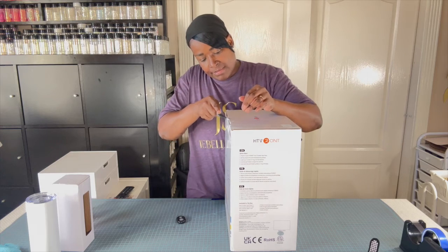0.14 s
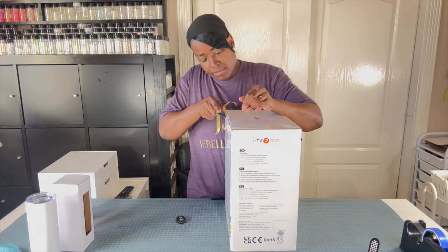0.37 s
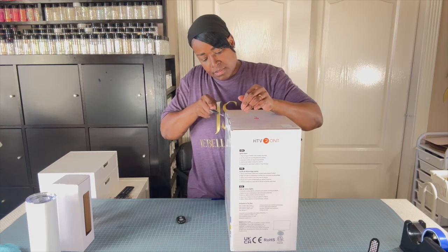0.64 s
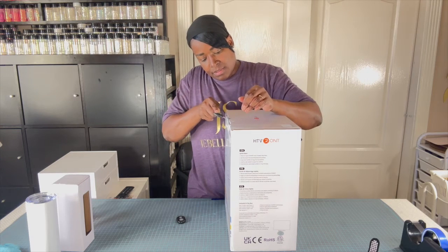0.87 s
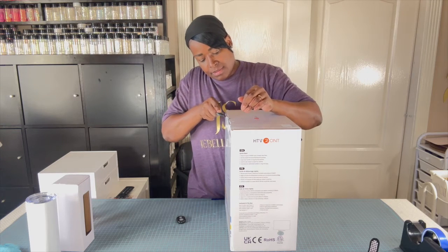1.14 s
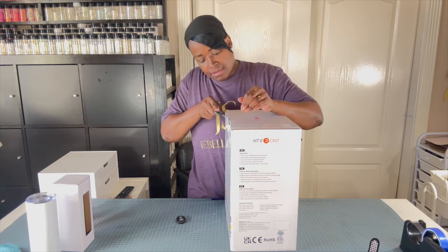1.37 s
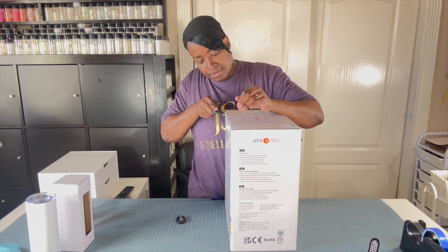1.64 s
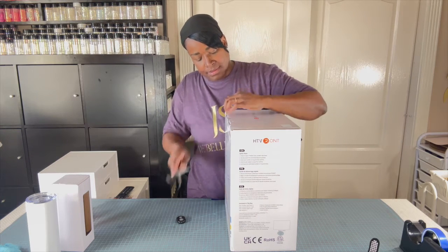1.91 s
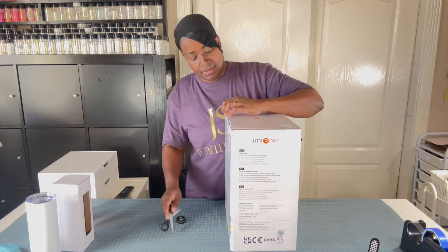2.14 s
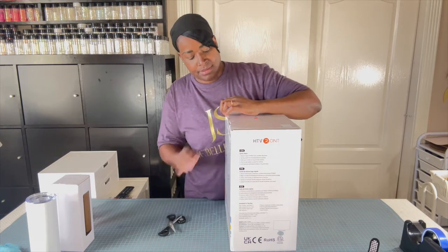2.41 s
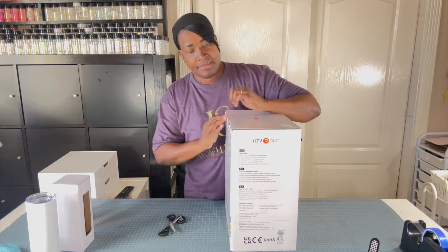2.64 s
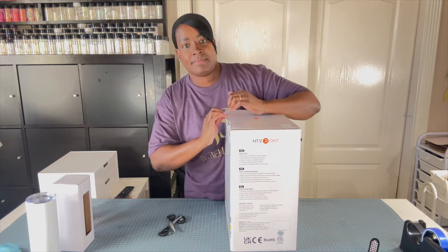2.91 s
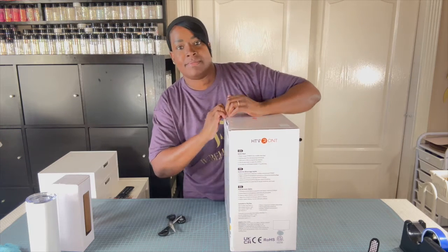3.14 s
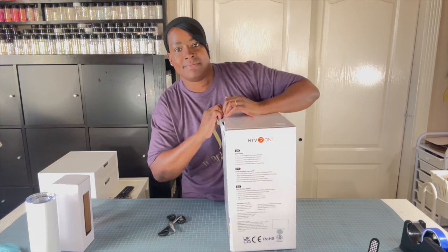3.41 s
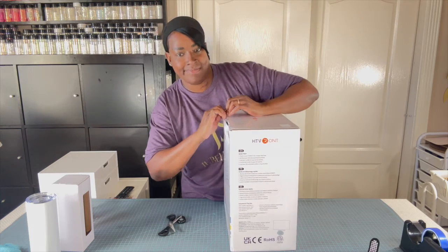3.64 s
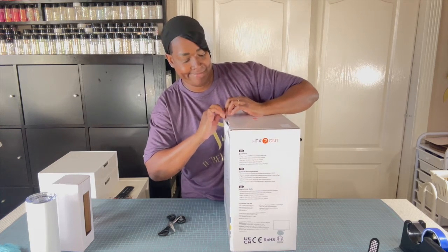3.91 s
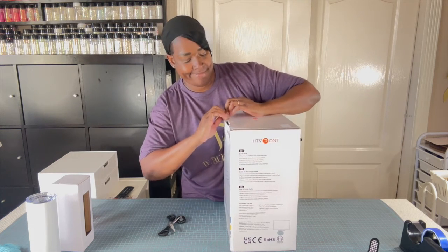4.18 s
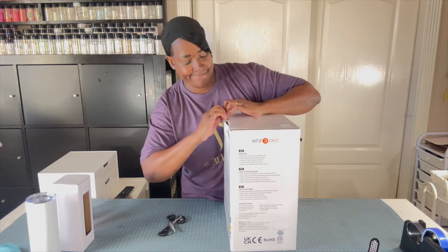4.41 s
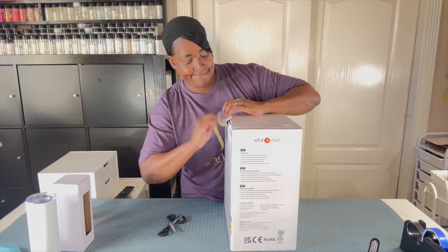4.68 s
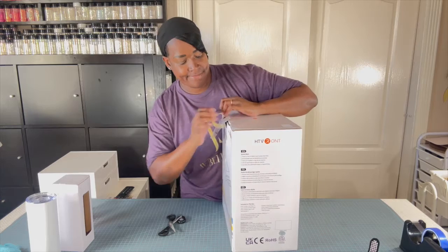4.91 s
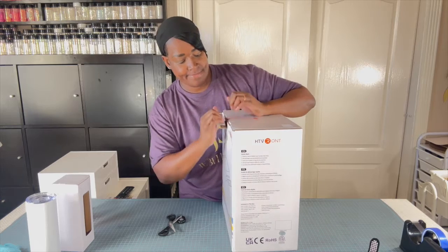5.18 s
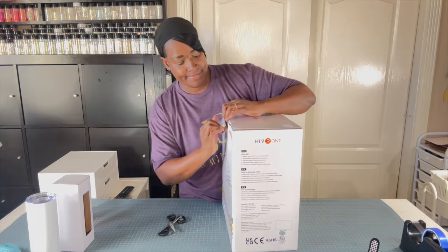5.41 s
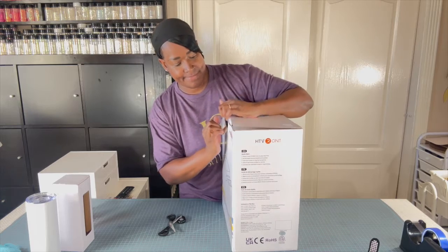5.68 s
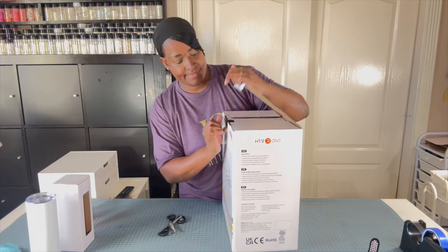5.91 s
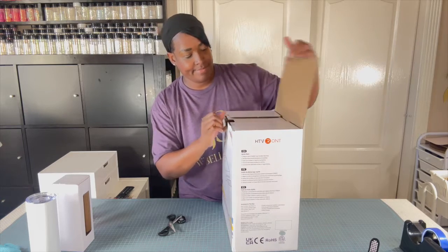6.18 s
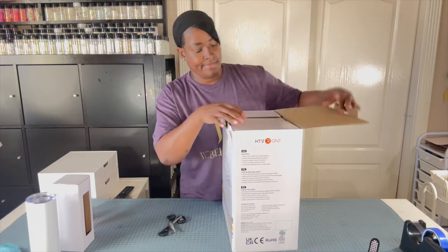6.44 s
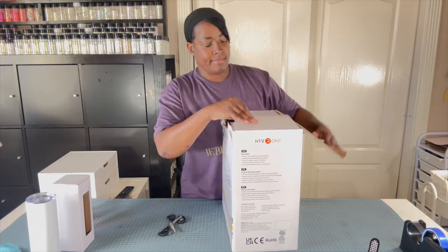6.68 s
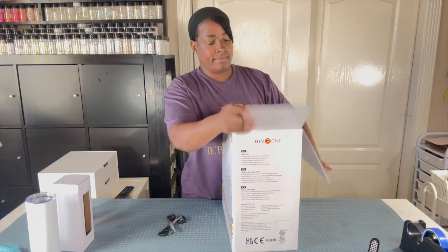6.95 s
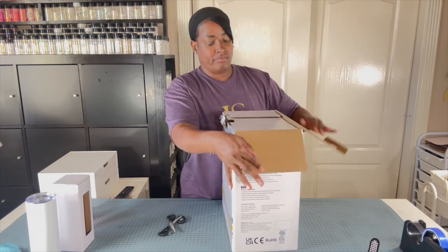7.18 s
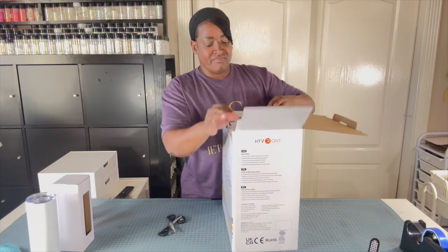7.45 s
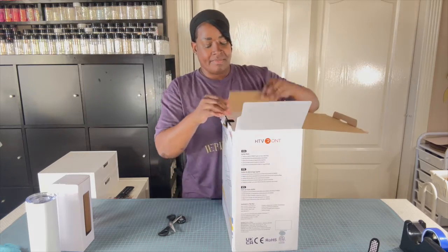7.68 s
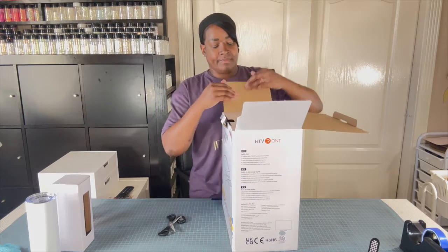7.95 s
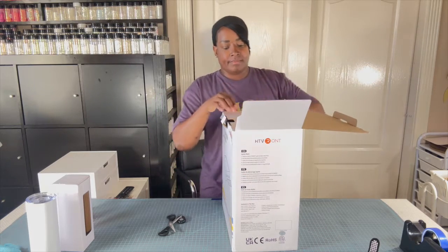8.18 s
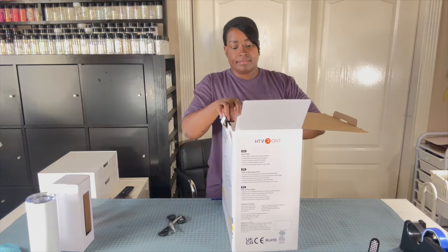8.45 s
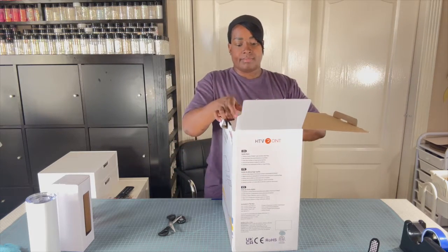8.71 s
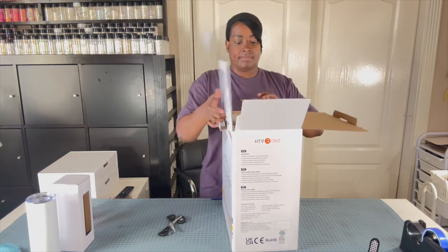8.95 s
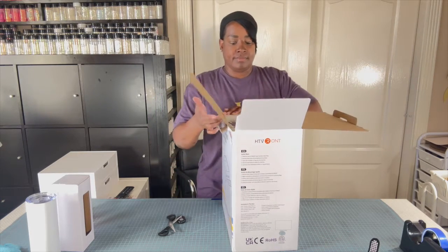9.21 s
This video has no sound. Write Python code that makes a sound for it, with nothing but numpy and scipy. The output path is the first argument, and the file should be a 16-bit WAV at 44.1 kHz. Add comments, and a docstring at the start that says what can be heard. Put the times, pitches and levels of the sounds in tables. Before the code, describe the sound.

Faint tape ticks and box rubbing, a hard steel clatter, a sharp burst of peeling tape, then soft cardboard scrapes and light taps.

```python
"""Packing tape, cut and peeled by hand on a tall cardboard box, cracks as noise impulses of slipping glue and blade.
Fingers and flaps knock the hollow box, a bank of damped modes; folds creak as stick-slip tones.
Scissors drop on the table as broad steel clacks over a dull thud; between these hits
the tape crackles and the cardboard rubs as random micro-slips.
All sounds in a small hard room with short echoes, over a faint hush of shaped noise."""
import sys
import numpy as np
from scipy import signal
from scipy.fft import rfft, irfft
from scipy.io import wavfile
from scipy.ndimage import uniform_filter1d

SR = 44100
rng = np.random.default_rng(int(sys.argv[2]) if len(sys.argv) > 2 else 0)


def to_wav(s):
    """Save 16-bit WAV."""
    ch = np.atleast_2d(s).T  # columns
    pcm = np.round(np.clip(ch, -1, 1) * 32767)  # PCM
    wavfile.write(sys.argv[1], SR, pcm.astype(np.int16))


def amplitude_ratio(level_db):
    """Convert a level in decibels to the matching linear amplitude (field) ratio."""
    exponent = np.asarray(level_db, float) / 20
    return 10 ** exponent


N = 411453  # length [samples]

# Scissors landing and rocking on the table: (time [s], relative clank level [dB], relative thud level [dB])
SCISSOR_DROPS = [(2.2179, -28.5, -36.5), (2.2518, -9, -24), (2.2555, -14, -25), (2.3009, -24, -30),
                 (2.412, -37.5, -44)]
# Hands resting and shifting on the box: (time [s], pressure [dB])
HAND_PRESSURE = [(0, -66.5), (.45, -67), (.6, -100), (1, -73), (1.35, -68), (1.85, -77), (2.7, -71),
                 (3.6, -72), (4.2, -71.5), (4.85, -68.5), (5.4, -68.5), (6.05, -70), (6.75, -64.5),
                 (7.2, -64.5), (7.65, -69), (7.85, -73), (8.6, -68.5), (9.33, -66)]
# Modes of the walls and air of the box: (frequency [Hz], relative level [dB])
BOX_MODES = [(125, 2), (200, 4.5), (337.5, 4.5), (503, 7), (593, 11.5), (702, 10.5), (828, 11.5), (930, 10),
             (1130, 6.5), (1392, 6), (1640, 9.5), (1880, 7.5), (2430, 4)]
# Spectral shape of the room hush: (frequency [Hz], relative level [dB])
HUSH_SHAPE = [(25, -49.5), (60, 5.5), (150, -4), (300, -6.5), (700, -18), (2000, -32.5), (6000, -40),
              (16000, -56)]
# Reverberation time of the room: (frequency [Hz], time to fall by 60 dB [s])
ROOM_T60 = [(150, 0.31), (400, 0.35), (1040, 0.33), (2760, 0.44), (7280, 0.31), (14000, 0.19)]
# Glue or blade letting go: (time [s], relative level [dB], centre frequency [Hz])
TAPE_CRACKS = [(0.125, -24.5, 4900), (0.2865, -35.5, 4030), (0.804, -41, 5200), (1.343, -47, 8100),
               (1.4287, -29, 7700), (1.4972, -26.5, 6300), (1.652, -42.5, 5870), (1.691, -42, 7500),
               (1.8026, -50, 3980), (2.156, -39, 6700), (2.457, -38, 5800), (2.7812, -45, 6650),
               (2.881, -35.5, 5000), (3.0912, -24, 6600), (3.132, -15.5, 6150), (3.1972, -28, 3500),
               (3.471, -32.5, 3670), (3.873, -48.5, 5000), (3.8957, -34.5, 4200), (4.2408, -41.5, 9200),
               (4.344, -41, 9500), (4.3964, -36.5, 7100), (4.428, -40, 5700), (4.4934, -23.5, 6550),
               (4.5442, -21, 5780), (4.551, -9, 6050), (4.576, -13, 6140), (4.588, -9.5, 2470),
               (4.6244, -11, 4120), (4.645, -12.5, 2950), (5.012, -38.5, 4170), (5.243, -23.5, 9900),
               (5.247, -29, 4700), (5.501, -40, 4440), (5.611, -44, 2750), (6.014, -42.5, 5000),
               (6.256, -44, 6500), (6.349, -41, 3020), (6.562, -25.5, 7800), (6.6258, -20.5, 7200),
               (7.039, -32, 5400), (7.1006, -32, 2920), (8.335, -30.5, 6200), (8.357, -29.5, 5040),
               (8.493, -29, 5950), (8.526, -30, 3300), (8.9, -23, 5800)]
# Fingers and flaps knocking the box: (time [s], relative level [dB], centre frequency at the struck spot [Hz])
BOX_KNOCKS = [(0.126, -27.5, 667), (0.429, -53.5, 493), (0.801, -45, 323), (0.979, -40, 580),
              (1.651, -50.5, 870), (1.691, -51, 500), (2.156, -33, 333), (2.445, -28.5, 537),
              (3.0931, -47, 1290), (3.1325, -34.5, 1400), (3.198, -36, 230), (3.677, -47.5, 204),
              (3.697, -46, 200), (3.876, -50.5, 340), (3.957, -45, 610), (4.142, -52, 736),
              (4.553, -30.5, 1150), (4.577, -19, 1060), (4.583, -23, 334), (4.625, -18, 1063),
              (4.637, -17.5, 790), (4.937, -42, 367), (5.248, -43, 390), (5.383, -50, 450),
              (6.632, -40, 850), (7.514, -54.5, 746), (7.571, -54.5, 1120), (8.058, -51, 620),
              (8.382, -43.5, 537), (8.491, -43.5, 620), (8.714, -44.5, 485), (8.902, -35.5, 1650),
              (9.138, -42.5, 417)]
# Folds creaking as the flap bends: (time [s], level [dB], frequency [Hz])
FOLD_CREAKS = [(4.325, -47.5, 784), (6.932, -44, 615), (6.944, -41, 1253), (6.972, -46, 1206),
               (7.026, -38.5, 1123), (7.032, -40, 393), (7.062, -51, 1277), (7.079, -39.5, 1193)]
# Scrapes and peels that swell and fade: (start [s], length [s], cardboard rub level [dB],
# tape crackle level over the rub [dB], crackle centre frequency [Hz])
HAND_STROKES = [(0.166, 0.042, -62, 11.5, 5300), (0.282, 0.073, -84, 18.5, 6250),
                (0.964, 0.04, -59, 10, 5600), (1.566, 0.16, -61, -6.5, 3460),
                (3.438, 0.11, -60.5, -24, 3620), (3.859, 0.042, -60, -4, 4100), (3.945, 0.11, -72, 1, 6400),
                (4.435, 0.098, -45.5, -3.5, 5900), (4.644, 0.072, -50.5, 7, 5450),
                (5.048, 0.038, -55.5, 2, 4400), (5.452, 0.028, -62, 1.5, 4950),
                (5.632, 0.086, -44, 4.5, 2400), (5.704, 0.18, -61.5, -21, 2500),
                (6.215, 0.1, -75, 18, 8000), (6.462, 0.066, -56, 3.5, 7700), (7.231, 0.21, -62.5, 12, 5070),
                (8.002, 0.12, -62.5, 0, 4300), (8.096, 0.097, -64, 6.5, 5870),
                (8.272, 0.19, -57.5, -1, 4300), (8.476, 0.088, -57.5, -1, 4450),
                (8.701, 0.025, -46.5, 1.5, 5040), (9.119, 0.088, -50.5, -5.5, 4380),
                (9.268, 0.16, -61, 7.5, 6200)]

BOX_T60 = 0.0071  # decay by 60 dB at 1 kHz [s]; low modes ring longer
REST_RUB_DB, REST_TAPE_DB = 1, -1  # rub and crackle of the steady part over their pressure curves [dB]
TAPE_GROWTH, FIRM_DB = 2, -65.5  # crackle dB per dB of pressure, about a firm grip [dB]
GAP_S, WALL_S, WALL_DB = 0.0065, 0.0095, 3  # late echoes at full strength [s], wall answer [s], its boost [dB]
LEAD = 100  # strain before a snap [samples]


def evened(x):
    """Root-mean-square normalisation: scales a signal to rms 1."""
    return x / np.sqrt(np.mean(x ** 2) + 1e-20)


def read(points, hz):
    """Logarithmic frequency scale: interpolates a table along log frequency."""
    f, value = np.transpose(points)
    return np.interp(np.log(hz + 1), np.log(f + 1), value)


def add(mix, s, sound):
    """Superposition: adds a sound to the mix at a time in seconds."""
    part = mix[round(s * SR):][:len(sound)]
    part += sound[:len(part)]


def hump_db(hz, centre_hz, slope_db, base_db):
    """Broad resonance: a peak falling slope_db per octave on each side, down to a base."""
    octaves = abs(np.log2((hz + 1) / centre_hz))
    return np.maximum(-slope_db * octaves, base_db)


def flutter(hz, centre_hz, slope_db, base_db):
    """Radiation of thin free sheets, tape and paper skin: no bass, a broad peak, a soft top."""
    no_bass = hz ** 2 / (hz ** 2 + 1400 ** 2)
    soft_top = 1 / (1 + (hz / 13000) ** 4)
    return amplitude_ratio(hump_db(hz, centre_hz, slope_db, base_db)) * no_bass * soft_top


def ring(modes, t60, weight_db=0, detune=1, size=2048):
    """Modal superposition: damped sines after one tap, with damping growing as the root of frequency."""
    hz, db = np.transpose(modes)[:, :, None]
    t = np.arange(size) / SR
    decay_db = -60 * t * np.sqrt(hz / 1000) / t60
    sides = np.cos(np.pi * np.arange(len(hz)))[:, None]  # neighbouring modes start in opposite directions
    sines = np.sin(2 * np.pi * hz * detune * t)
    return (sides * amplitude_ratio(db + weight_db + decay_db) * sines).sum(0)


def burst(noise, seconds, ragged):
    """Impulsive contact: one sharp push, then a ragged after-shake of exponentially decaying noise."""
    n = np.arange(len(noise))
    shake = ragged * noise * np.exp(-n / SR / seconds)
    return shake + (n == 0)


def hush():
    """Stationary coloured noise: a faint room hush whose level wanders in time-frequency patches."""
    frames, hz = N // 256 + 5, np.fft.rfftfreq(1024, 1 / SR)
    real, imag, patches = rng.standard_normal((frames, 513, 3)).T
    patches = uniform_filter1d(patches, 12, 0)
    patches = evened(uniform_filter1d(patches, 14, 1))
    z = (real + 1j * imag) * amplitude_ratio(read(HUSH_SHAPE, hz)[:, None] + 3 * patches)
    noise = signal.istft(z, nperseg=1024, noverlap=768)[1][:N]
    return amplitude_ratio(-64) * evened(noise)


def room(x, count=3):
    """Reverberation: first echoes off table and box, a gap, the walls, then a dense tail dying by band."""
    out, turn, lag = np.zeros(N), np.arange(N) / SR / 0.13, np.arange(SR // 2) / SR
    first = amplitude_ratio(7.0) * np.exp(-lag / 0.0016) * (lag > 0.0008)
    onset = np.clip(2 * lag / GAP_S - 1, 0, 1) ** 2
    walls = amplitude_ratio(WALL_DB * np.exp(-((lag - WALL_S) / 0.003) ** 2))
    for k in range(count):
        hz, t, z = signal.stft(rng.standard_normal(SR // 2), SR, nperseg=256)
        decay = amplitude_ratio(-60 * t / read(ROOM_T60, hz)[:, None])
        tail = signal.istft(z * decay, SR, nperseg=256)[1][:SR // 2]
        response = tail / np.linalg.norm(tail) * (first + onset * walls)
        # tails take turns so that like hits differ
        share = np.sqrt(2 / count) * np.cos(np.pi * (turn + k / count))
        out += signal.oaconvolve(x * share, response)[:N]
    return out


def grains(per_s, spread_db):
    """Poisson-like process: random micro-slips of either sign, a few of them large."""
    size = amplitude_ratio(spread_db * np.minimum(rng.exponential(1, N), 3.5))
    size = size * rng.choice([-1, 1], N)
    return size * (rng.random(N) < per_s / SR)


def crackle(slips_in, centre_hz, slope_db=5.0):
    """Spectral filtering: micro-slips take the colour of free tape and paper skin, at rms 1."""
    hz = np.fft.rfftfreq(len(slips_in), 1 / SR)
    colour = flutter(hz, centre_hz, slope_db, base_db=-34.5)
    return evened(irfft(rfft(slips_in) * colour, len(slips_in)))


def handling():
    """Sliding friction: micro-slips shake the box and crackle glue and paper; strokes swell above it."""
    t = np.arange(N) / SR
    press_db = np.interp(t, *np.transpose(HAND_PRESSURE))
    tape_db = press_db + (TAPE_GROWTH - 1) * (press_db - FIRM_DB)
    # uneven pressure
    grip = uniform_filter1d(rng.standard_normal(N), 700)
    grip = evened(uniform_filter1d(grip, 700))
    # rubbing barely stirs the deepest modes
    skin_db = hump_db(np.array(BOX_MODES)[:, :1], 770, slope_db=4.5, base_db=-20)
    rub = signal.oaconvolve(grains(700, spread_db=3.5), ring(BOX_MODES, BOX_T60, skin_db))[:N]
    rub = evened(rub) * amplitude_ratio(2.5 * grip)
    ticks = grains(12000, spread_db=4.0) * amplitude_ratio(1.7 * grip)
    # stray bits of glue letting go under the hands
    snaps = crackle(grains(30, spread_db=5.0), 6000) * amplitude_ratio(-9)
    out = rub * amplitude_ratio(press_db + REST_RUB_DB)
    out += (crackle(ticks, 5000) + snaps) * amplitude_ratio(tape_db + REST_TAPE_DB)
    for start, length, rub_db, over_db, hz in HAND_STROKES:
        part = slice(round(start * SR), round((start + length) * SR))
        progress = (t[part] - start).clip(0) / length
        swell = abs(np.sin(np.pi * progress ** 1.18)) ** 1.2  # gathers speed, stops short
        tape = amplitude_ratio(over_db) * crackle(ticks[part], hz, slope_db=5.5)
        out[part] += swell * amplitude_ratio(rub_db) * (rub[part] + tape)
    return out


def creak(db, hz):
    """Stick-slip oscillation: a short tone with a roughly wandering phase that swells and fades."""
    seconds = min(0.017, 24 / hz)  # at most 24 cycles
    t = np.arange(0, seconds, 1 / SR)
    wobble = evened(uniform_filter1d(rng.standard_normal(2048), 80))[:len(t)]
    tone = np.sin(2 * np.pi * hz * t + 0.8 * wobble)
    return amplitude_ratio(db) * tone * np.sin(np.pi * t / seconds) ** 2


def creaks():
    """Stick-slip friction in the folds: one creak for each slip of the bending flap."""
    out = np.zeros(N)
    for s, db, hz in FOLD_CREAKS:
        add(out, s, creak(db, hz))
    return out


def scissors():
    """Rigid-body impact: the steel clacks broad and sharp over a dull thud."""
    out, noise = np.zeros(N), rng.standard_normal((len(SCISSOR_DROPS), 2, 2048))
    for (s, clank_db, thud_db), (steel, table) in zip(SCISSOR_DROPS, noise):
        clank = crack(steel * abs(steel), clank_db, 2700, seconds=0.0015, ragged=0.96)
        add(out, s - LEAD / SR, clank)
        add(out, s, knock(table, thud_db, 730))
    return out


def knock(noise, db, centre_hz):
    """Modal excitation: a soft contact rings the modes nearest the struck spot; the grip detunes them."""
    near_db = hump_db(np.array(BOX_MODES)[:, :1], centre_hz, slope_db=10, base_db=-27)
    detune = 1 + 0.03 * noise[-len(BOX_MODES):, None]
    contact = burst(noise, 0.0025, ragged=0.035)
    sound = signal.fftconvolve(contact, ring(BOX_MODES, BOX_T60, near_db, detune))
    # flesh and cardboard give before they push
    sound *= 1 - np.exp(-np.arange(len(sound)) / SR / 0.0021)
    # knocks carry little deep bass
    sound = signal.lfilter(*signal.butter(2, 110, "high", fs=SR), sound)
    return amplitude_ratio(db + 23.5) * sound / np.linalg.norm(sound)


def knocks():
    """Struck resonator: fingers and flaps knock the hollow box."""
    out, noises = np.zeros(N), rng.standard_normal((len(BOX_KNOCKS), 1024))
    for (s, db, hz), noise in zip(BOX_KNOCKS, noises):
        add(out, s, knock(noise, db, hz))
    return out


def crack(noise, db, centre_hz, seconds=0.0014, ragged=0.5):
    """Sudden release of strain: a wide, even snap, brightest where the free tape flutters."""
    colour = flutter(np.fft.rfftfreq(len(noise), 1 / SR), centre_hz, slope_db=9.0, base_db=-8)
    strain = burst(noise[::-1], seconds / 5, ragged)[LEAD:0:-1]  # reversed in time: grows up to the snap
    release = burst(noise[:-LEAD], seconds, ragged)
    z = rfft(np.concatenate((strain, release)))
    z = z / abs(z) ** 0.45  # partly evens the spectrum
    sound = irfft(z * colour, len(noise)) * np.linspace(1, 0, len(noise)) ** 2
    return amplitude_ratio(db + 8.0) * sound / np.linalg.norm(sound)


def slips():
    """Adhesive failure: the bright cracks of glue and blade."""
    out, noises = np.zeros(N), rng.standard_normal((len(TAPE_CRACKS), 1024))
    for (s, db, hz), noise in zip(TAPE_CRACKS, noises):
        add(out, s - LEAD / SR, crack(noise, db, hz))
    return out


def scene():
    """Linear superposition: direct sounds, their reverberation and the hush; knocks stir the room most."""
    hits = slips() + scissors()
    blows, rustle, folds = knocks(), handling(), creaks()
    wet = room(amplitude_ratio(0.63) * hits + amplitude_ratio(1.5) * blows + rustle + amplitude_ratio(-2.5) * folds)
    return (hits + blows + rustle + folds + wet + hush())[None]


def roll_off(x):
    """The treble ends steeply here."""
    return signal.sosfilt(signal.butter(12, 17000, fs=SR, output="sos"), x)


def record(dry):
    """Band limiting: the microphone loses the deep bass; a fixed low-pass at 16 kHz bounds the top."""
    no_bass = signal.sosfilt(signal.butter(2, 130, "high", fs=SR, output="sos"), dry)
    mix = signal.oaconvolve(no_bass, signal.firwin(255, 16000, fs=SR)[None], "same")
    return roll_off(mix)


dry = scene()
out = record(dry)
to_wav(out)
```